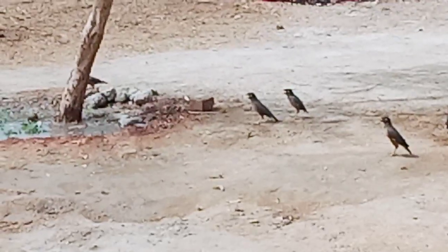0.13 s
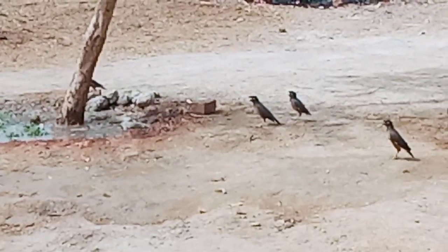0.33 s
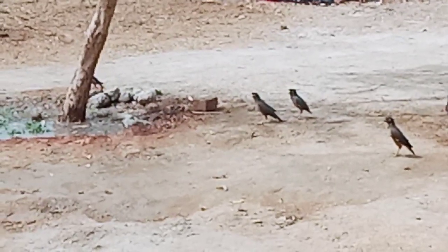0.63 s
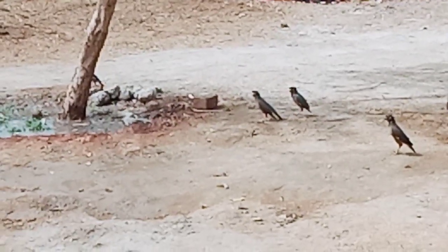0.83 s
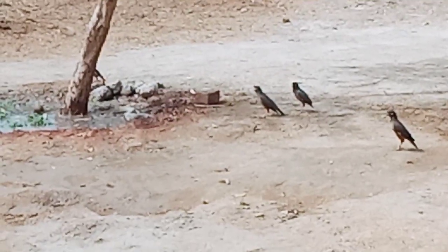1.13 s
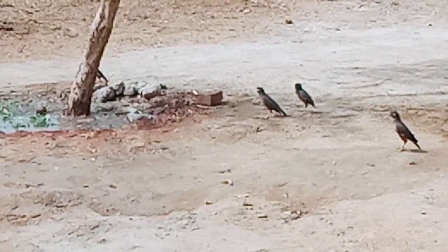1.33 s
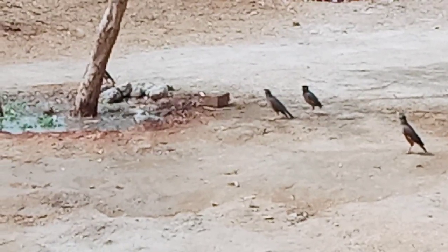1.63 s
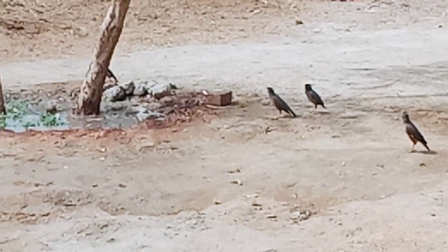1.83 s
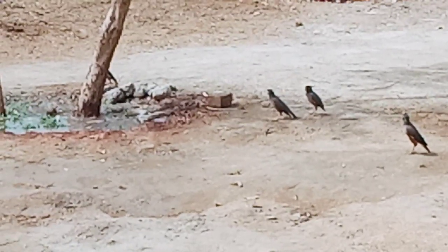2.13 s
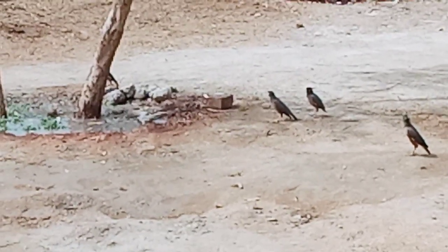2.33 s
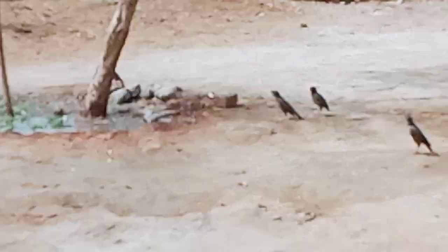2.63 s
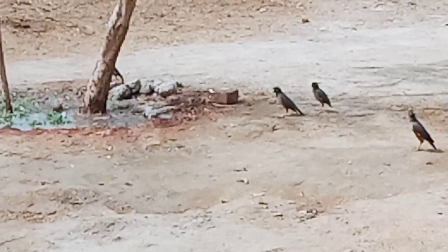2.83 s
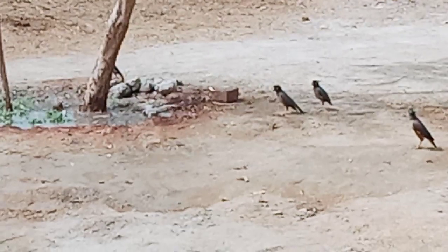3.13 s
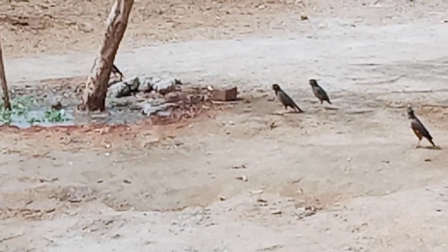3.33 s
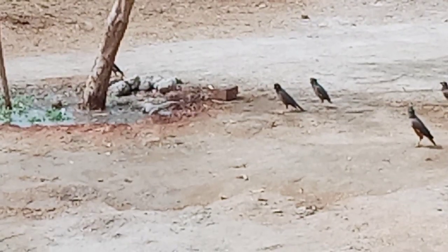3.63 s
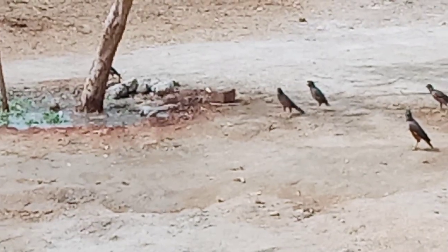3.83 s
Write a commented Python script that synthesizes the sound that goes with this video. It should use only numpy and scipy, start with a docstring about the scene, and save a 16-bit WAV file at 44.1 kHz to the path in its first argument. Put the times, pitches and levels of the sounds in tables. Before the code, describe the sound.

Mynas scold harshly in quick, partly overlapping rasps for about two seconds, then pause while faint distant birds whistle and churr; another near rasp ends it. Open dry ground, scattered echoes, low town hum, microphone some distance away.

```python
"""Harsh scolding of three mynas on open dry ground, calls sometimes overlapping, over the steady hum of a town.
Each call starts as an even rattle of syrinx clicks and swells into a rasp of air puffs ringing in the beak.
Walls and trees nearby smear the calls as scattered echoes. Far off are a buzzy rising whistle (a sine),
a low churr (filtered clicks), short chirps and a throbbing insect (filtered noise). The hum's bass dips
briefly three times near the start."""
import sys
import numpy as np
from scipy import signal
from scipy.io import wavfile
from scipy.ndimage import uniform_filter1d

SR = 44100
rng = np.random.default_rng(int(sys.argv[2]) if len(sys.argv) > 2 else 0)


def int16_out(signal):
    """Quantize to a 16-bit WAV file."""
    q = np.round(np.clip(np.atleast_2d(signal).T, -1, 1) * 32767)
    wavfile.write(sys.argv[1], SR, q.astype(np.int16))


N = 176400
T = np.arange(N) / SR
LEAD = SR // 4  # samples of calling before time zero, so that echoes are already there

# Effort of the near birds, one list of rows per call.
# Each row: time in seconds, relative level in dB, beak resonance in Hz.
FIRST_BIRD_CALLS = [
    [(.02, -25.5, 3600), (.18, -29.5, 3800), (.3, -35, 3460), (.38, -34, 3450), (.43, -46.5, 3270)],
    [(.455, -32.5, 3650), (.55, -26.5, 3630), (.72, -28, 3500), (.82, -27, 3600), (.9, -24.5, 3530)],
    [(1.075, -31, 3700), (1.16, -20.5, 3470), (1.27, -29, 3700), (1.42, -24, 3670), (1.5, -31.5, 3460)],
    [(1.725, -33.5, 3640), (1.82, -22, 3500), (1.9, -27.5, 3700), (1.99, -23.5, 3900), (2.12, -29, 3430),
     (2.2, -44, 3200)],
]
SECOND_BIRD_CALLS = [
    [(-.17, -31, 3880), (0, -29, 3600), (.07, -24.5, 3600), (.15, -24.5, 3600), (.285, -25.5, 3700),
     (.3, -40, 3500)],
    [(.7, -23, 3700), (.85, -29, 3600), (.95, -22.5, 3620), (1.04, -31, 3570), (1.075, -28.5, 3400)],
    [(1.32, -35, 3700), (1.45, -23, 3600), (1.57, -24, 3600), (1.64, -29.5, 3700), (1.655, -41.5, 3400)],
]
THIRD_BIRD_CALLS = [
    [(3.305, -27, 3880), (3.33, -32, 4180), (3.365, -29.5, 3920), (3.405, -30, 3510), (3.44, -34, 3370),
     (3.57, -30.5, 3530), (3.7, -29.5, 3700), (3.79, -33, 3430), (3.87, -47.5, 3100)],
]
# Spectral colour of the voices. Each row: frequency in Hz, then the first, second and third bird's gain in dB.
VOICE_COLOURS = [(487, -57.5, -33.5, -40.5), (950, -31.5, -28.5, -22), (1560, -25, -21.5, -21),
                 (1770, -19.5, -17.5, -14), (2490, -15, -12, -10), (2980, -9.5, -11, -7.5),
                 (3680, -9, -11, -8), (4090, -9, -9.5, -11.5), (4620, -19.5, -22.5, -20.5),
                 (5530, -31, -28.5, -31), (6270, -27, -31, -28), (7000, -35, -34, -36),
                 (7820, -49, -47, -50.5), (8600, -55, -45.5, -50), (9030, -46.5, -62, -56.5),
                 (10000, -64, -63.5, -65), (10600, -60.5, -56.5, -64), (11700, -56.5, -57.5, -59),
                 (12500, -68.5, -68, -68), (15500, -84, -64, -80)]
# Mean click rate of the syrinx: one value in Hz for each bird.
CLICK_RATES_HZ = (137.25, 144.5, 136.6)
# Pitch glide of the far whistle. Each row: time in seconds, pitch in Hz, level in dB.
WHISTLE_GLIDE = [(2.318, 2167, -56), (2.361, 2456, -55), (2.41, 2930, -51.5), (2.449, 3175, -50),
                 (2.48, 3150, -59), (2.53, 3160, -63), (2.64, 3256, -72)]
# Low resonance of the far churr. Each row: time in seconds, pitch in Hz, level in dB.
CHURR_GLIDE = [(2.68, 1870, -63), (2.74, 1850, -55), (2.86, 1910, -52), (2.92, 1920, -60.5),
               (2.97, 1840, -60), (3.07, 1860, -69)]
# Far chirps and clucks. Each row: centre in seconds, pitch in Hz, level in dB, half length in seconds,
# resonance width in Hz.
FAR_CHIRPS = [(.03, 1090, -53, .035, 60), (.262, 1170, -53, .015, 200), (.368, 1620, -44, .012, 100),
              (1.028, 1200, -47, .015, 120), (1.635, 1150, -44, .014, 100), (2.92, 3780, -51, .016, 400),
              (3.047, 3750, -52, .014, 400), (3.115, 6480, -69, .035, 80), (3.23, 3900, -57, .02, 700)]
# Distance dulls the far birds. Each row: frequency in Hz, gain in dB.
FAR_AIR_COLOUR = [(1000, 0), (4300, 0), (5200, -8), (7000, -8), (8200, -35)]
# Spectrum of the town hum. Each row: frequency in Hz, relative level in dB per Hz.
TOWN_SPECTRUM = [(20, -41.5), (35, -27.5), (55, -17.5), (85, -8), (150, -9), (250, -5.5), (420, -5),
                 (800, -5.5), (1100, -11), (2000, -10), (3700, -14.5), (4400, -22.5), (5000, -31.5),
                 (5600, -43), (6300, -35.5), (7700, -41), (8200, -58.5), (15500, -62)]
# Low moans swelling in the hum. Each row: centre in seconds, pitch in Hz, level in dB, half length in seconds.
TOWN_MOANS = [(0.608, 251, -57.5, 0.23), (1.84, 232, -53, 0.14), (3.25, 88.6, -60.5, 0.27)]
# Bass gain of the background, with three brief dips in the first 0.4 s.
# Each row: time in seconds, gain in dB.
BASS_GAIN = [(0, 0), (.04, 5), (.068, -10), (.1, 2), (.138, -8), (.17, 0), (.29, 4.5), (.33, -21), (.37, 3),
             (.75, 1), (4, 1.5)]
# Resonances of the shelter around the microphone. Each row: frequency in Hz, gain in dB.
SHELTER_RINGS = [(2233, 0.5), (2397, 0), (2952, -2.5), (3045, -2.5), (3268, -1.5), (3310, -2), (3467, -11),
                 (3715, -0.5), (3987, -5)]

# Near calls: settings named START and FULL apply to the even rattle and to the full rasp
EVEN_S = .17  # time in which the even rattle turns rough
ROUGH_START, ROUGH_FULL = .08, .7  # share of puff power driving the beak
JITTER_START, JITTER_FULL = .02, .22  # rms wobble of the click rate's logarithm
PUFF_START, PUFF_FULL = .15, .3  # decay time of a puff in click periods
SIZE_SPREAD_DB = 2.5  # spread of pulse sizes in the full rasp
BEAK_FULL_WIDTH_HZ, BEAK_DB = 504, 4.5  # the width starts at half
PUFF_DB = -3  # direct puffs in the full rasp; doubled in dB at first, so the first clicks are mostly beak ring
BIRDS_DB = -10.5  # overall level of the near birds
# Echoes: total level against the direct sound, and time to decay by 60 dB
ECHO_DB, ECHO_T60_S, ECHO_GAP_S = 3, .3, .0072
LATE_DB, LATE_T60_S = -11.5, .99
TREBLE_HZ, TREBLE_T60_S = 4860, .36  # extra treble decay of the short tail
SHELTER_WIDTH_HZ = 16
# Far birds
WHISTLE_BUZZ_HZ, WHISTLE_BUZZ_DEPTH = 165, .5
WHISTLE_WAVER = .004  # rms share of the pitch
CHURR_HZ, CHURR_WIDTH_HZ = 80, 260  # click rate about which the churr wanders; width of one resonance
CHURR_TOP_HZ, CHURR_TOP_WIDTH_HZ, CHURR_TOP_DB = 6050, 1100, -19
CHIRP_FALL_MOST_PER_S = 1.2  # share of the pitch, for the widest chirps
# Insect: level before throbbing, time of one throb's peak
INSECT_HZ, INSECT_WIDTH_HZ, INSECT_DB = 7550, 160, -89
THROBS_PER_S, THROB_PEAK_S = 11.5, 2.935
# Town
TOWN_DB, BASS_TOP_HZ, MOAN_WIDTH_HZ = -46.5, 280, 35
DRONE_HZ, DRONE_WANDER_HZ, DRONE_DB = 190.6, 4, -62.5
BAND_LIMIT_HZ = 15500


def scold(rows, click_hz):
    """Source and filter: syrinx clicks and turbulent puffs excite the moving resonance of the beak."""
    s, db, hz = np.transpose(rows)
    first, last = round(s[0] * SR), round(s[-1] * SR)
    t = np.arange(first, last) / SR
    grown = np.minimum((t - s[0]) / EVEN_S, 1) ** 2
    rough = ROUGH_START + (ROUGH_FULL - ROUGH_START) * grown

    jitter = JITTER_START + (JITTER_FULL - JITTER_START) * grown
    wobble = evened(uniform_filter1d(rng.standard_normal(len(t)), size=300))
    turns = np.cumsum(click_hz * np.exp(jitter * wobble)) / SR

    # one random size per click period
    sizes = gain_of(SIZE_SPREAD_DB * grown * rng.standard_normal(len(t))[turns.astype(int)])
    puff_length = PUFF_START + (PUFF_FULL - PUFF_START) * grown
    puff_shape = evened(np.exp(-(turns % 1) / puff_length))
    puffs = puff_shape * sizes * rng.standard_normal(len(t))
    pulses = evened(clicks(turns, 0)) * sizes

    drive = np.sqrt(1 - rough) * pulses + np.sqrt(rough) * puffs
    beak = resonate(drive, np.interp(t, s, hz), BEAK_FULL_WIDTH_HZ * (.5 + .5 * grown))
    voice = puffs * gain_of(PUFF_DB * (2 - grown)) + gain_of(BEAK_DB) * beak
    out = np.zeros(N + LEAD)
    out[first + LEAD:last + LEAD] = voice * gain_of(np.interp(t, s, db))
    return out


def mynas():
    """Individual timbre: each bird has its own click rate, vocal spectrum and scattered echoes."""
    hz, *colours = np.transpose(VOICE_COLOURS)
    birds = (FIRST_BIRD_CALLS, SECOND_BIRD_CALLS, THIRD_BIRD_CALLS)
    out = np.zeros(N)
    for calls, click_hz, db in zip(birds, CLICK_RATES_HZ, colours):
        # dividing by the filter's energy gain keeps only its colour
        energy_gain = np.linalg.norm(coloured(np.eye(1, 4096)[0], hz, db))
        voice = coloured(sum(scold(rows, click_hz) for rows in calls), hz, db)
        out += surroundings(voice / energy_gain * gain_of(BIRDS_DB))[LEAD:]
    return out


def surroundings(x):
    """Scattering: ground and trees return a dense short tail, walls a faint long one."""
    t = np.arange(SR) / SR
    taps = np.zeros(SR)
    slots = np.arange(0, SR - 20, 20)
    places = slots + rng.integers(0, 20, SR // 20 - 1)
    taps[places] = rng.choice([-1., 1.], SR // 20 - 1)
    taps *= np.clip(t / ECHO_GAP_S - 1, 0, 1)  # silent through the gap, full after twice the gap

    # the short tail loses its treble sooner
    treble_filter = signal.firwin(101, TREBLE_HZ, pass_zero=False, fs=SR)
    treble = signal.oaconvolve(taps, treble_filter, "same")
    dulled = taps - treble * (1 - gain_of(-60 * t / TREBLE_T60_S))
    near = dulled * gain_of(-60 * t / ECHO_T60_S)
    late = taps * gain_of(-60 * t / LATE_T60_S)
    tail = gain_of(ECHO_DB) * near / np.linalg.norm(near)
    tail += gain_of(LATE_DB) * late / np.linalg.norm(late)
    return x + signal.fftconvolve(x, tail)[:len(x)]


def shelter(x):
    """Sympathetic resonance: the shelter around the microphone rings along at a few pitches."""
    return x + sum(gain_of(db) * resonate(x, hz, SHELTER_WIDTH_HZ) for hz, db in SHELTER_RINGS)


def far_whistle():
    """Frequency and amplitude modulation: a wavering sine whose rise is buzzed."""
    s, hz, db = np.transpose(WHISTLE_GLIDE)
    waver = 1 + WHISTLE_WAVER * evened(uniform_filter1d(rng.standard_normal(N), size=150))
    tone = np.sin(2 * np.pi * np.cumsum(np.interp(T, s, hz) * waver) / SR)
    buzz = 1 + WHISTLE_BUZZ_DEPTH * np.sin(2 * np.pi * WHISTLE_BUZZ_HZ * T) * (T < s[3])
    return tone * gain_of(np.interp(T, s, db, -120, -120)) * buzz


def far_churr():
    """Pulse excitation: one irregular click train excites a low and a high resonance."""
    s, hz, db = np.transpose(CHURR_GLIDE)
    rate = CHURR_HZ * np.exp(.34 * evened(uniform_filter1d(rng.standard_normal(N), size=500)))
    pitch = np.interp(T, s, hz)
    train = clicks(np.cumsum(rate) / SR, 2.7)
    rattle = evened(resonate(resonate(train, pitch, CHURR_WIDTH_HZ), pitch, 2 * CHURR_WIDTH_HZ))
    top = train
    for _ in range(4):
        top = evened(resonate(top, CHURR_TOP_HZ, CHURR_TOP_WIDTH_HZ))
    return (rattle + gain_of(CHURR_TOP_DB) * top) * gain_of(np.interp(T, s, db, -120, -120))


def far_chirps():
    """Narrow-band noise: a falling resonance selects each chirp under a bell-shaped envelope."""
    out, air = np.zeros(N), rng.standard_normal(N)
    for s, hz, db, half_s, width_hz in FAR_CHIRPS:
        at = slice(max(round((s - 3 * half_s) * SR), 0), round((s + 3 * half_s) * SR))
        fall_per_s = CHIRP_FALL_MOST_PER_S * min(width_hz / 450, 1)  # narrow chirps fall less
        pitch = hz * (1 - fall_per_s * (T[at] - s))
        note = resonate(resonate(air[at], pitch, width_hz), pitch, width_hz)
        out[at] += evened(note) * gain_of(db) * np.exp(-((T[at] - s) / half_s) ** 2)
    return out


def far_birds():
    """Propagation loss: distance dulls all the far birds; whistle and churr also have echoes."""
    out = surroundings(far_whistle() + far_churr()) + far_chirps()
    return coloured(out, *np.transpose(FAR_AIR_COLOUR))


def insect():
    """Amplitude modulation: a faint high band of noise throbs evenly."""
    buzz = rng.standard_normal(N)
    for _ in range(2):
        buzz = resonate(buzz, INSECT_HZ, INSECT_WIDTH_HZ)
    throb = np.cos(np.pi * THROBS_PER_S * (T - THROB_PEAK_S)) ** 4
    return gain_of(INSECT_DB) * evened(buzz) * throb


def town_wash():
    """Random-phase spectrum: broad noise whose patches of time and frequency drift slowly in level."""
    frames, hz = N // 512 + 5, np.fft.rfftfreq(2048, 1 / SR)
    real, imaginary, patches = rng.standard_normal((frames, 1025, 3)).T
    patches = uniform_filter1d(patches, size=10, axis=0)
    patches = evened(uniform_filter1d(patches, size=10, axis=1))
    f, db = np.transpose(TOWN_SPECTRUM)
    colour_db = np.interp(np.log(hz + 1), np.log(f), db)[:, None]
    spectrum = (real + 1j * imaginary) * gain_of(colour_db + 1.9 * patches)
    return evened(signal.istft(spectrum, nperseg=2048, noverlap=1536)[1][:N])


def town():
    """Superposition: wide noise, a wavering drone and resonant moans, under one bass gain curve."""
    wander = evened(uniform_filter1d(rng.standard_normal(N), size=4000))
    drone = np.sin(2 * np.pi * np.cumsum(DRONE_HZ + DRONE_WANDER_HZ * wander) / SR)
    hum = gain_of(TOWN_DB) * town_wash() + gain_of(DRONE_DB) * evened(drone)
    for s, hz, db, half_s in TOWN_MOANS:
        moan = resonate(resonate(rng.standard_normal(N), hz, MOAN_WIDTH_HZ), hz, MOAN_WIDTH_HZ)
        hum += gain_of(db) * evened(moan) * np.exp(-((T - s) / half_s) ** 2)
    bass = signal.oaconvolve(hum, signal.firwin(801, BASS_TOP_HZ, fs=SR), "same")
    return hum + bass * (gain_of(np.interp(T, *np.transpose(BASS_GAIN))) - 1)


def clicks(turns, size_db):
    """Pulse train: one click per whole turn, its level scattered by size_db."""
    starts = np.diff(np.floor(turns), prepend=-1) > 0
    return starts * gain_of(size_db * rng.standard_normal(len(turns)))


def resonate(x, hz, width_hz):
    """Damped resonance of peak gain 1 that follows the curve hz."""
    if np.ndim(width_hz):  # a changing width blends the narrowest and the widest ring
        narrow, wide = width_hz.min(), width_hz.max()
        share = (width_hz - narrow) / np.ptp(width_hz)
        return (1 - share) * resonate(x, hz, narrow) + share * resonate(x, hz, wide)
    # shift the pitch to 0 Hz, smooth there, and shift it back
    turn = np.exp(2j * np.pi * np.cumsum(hz * np.ones(len(x))) / SR)
    r = np.exp(-np.pi * width_hz / SR)
    return 2 * (turn * signal.lfilter([1 - r], [1, -r], x / turn + 1e-18)).real


def coloured(x, hz, db):
    """Minimum-phase filtering: a causal filter with the gain db at hz."""
    f = abs(np.fft.fftfreq(8192, 1 / SR))
    log_gain = np.interp(np.log(f + 1), np.log(hz), db) * np.log(10) / 20
    response = np.exp(np.conj(signal.hilbert(log_gain)))
    taps = np.fft.ifft(response).real[:2048]
    return signal.oaconvolve(x, taps)[:len(x)]


def gain_of(db):
    """Decibel law: amplitude ratio of a level."""
    return 10 ** (np.asarray(db) / 20)


def evened(x):
    """Power normalization: scale to an rms of 1."""
    return x / np.sqrt(np.mean(x ** 2) + 1e-20)


def scene():
    """Superposition of the near birds, ringing in the shelter, with the far sounds."""
    return (shelter(mynas()) + far_birds() + insect() + town())[None]


def record(dry):
    """Low-pass filtering: the band limit of the recorder."""
    low_pass = signal.firwin(511, BAND_LIMIT_HZ, window=("kaiser", 9), fs=SR)
    return signal.oaconvolve(dry, low_pass[None], "same")


dry = scene()
out = record(dry)
int16_out(out)
```